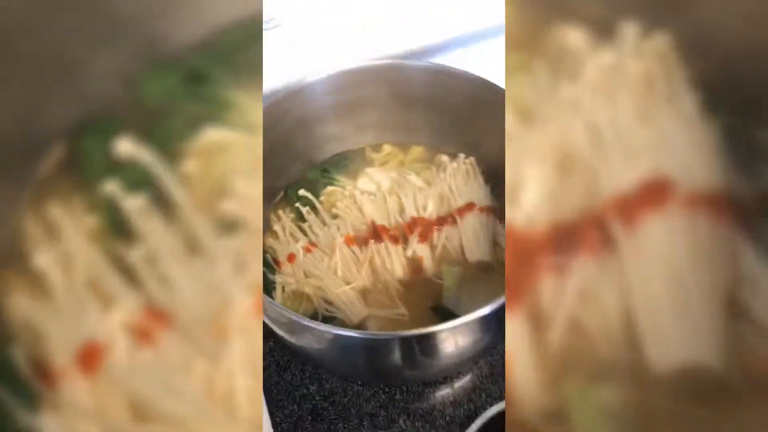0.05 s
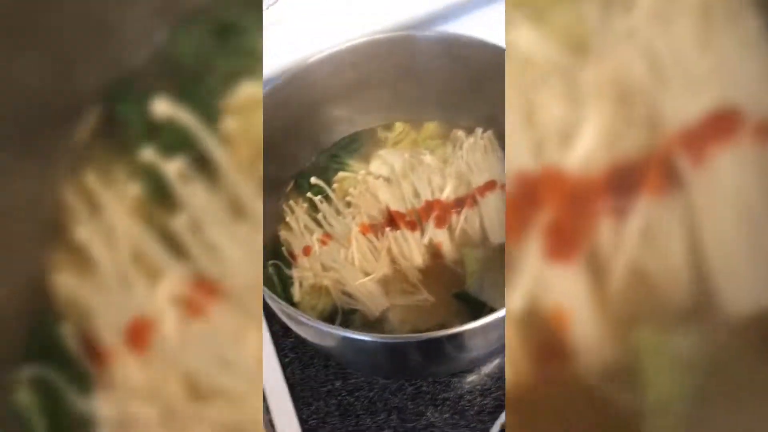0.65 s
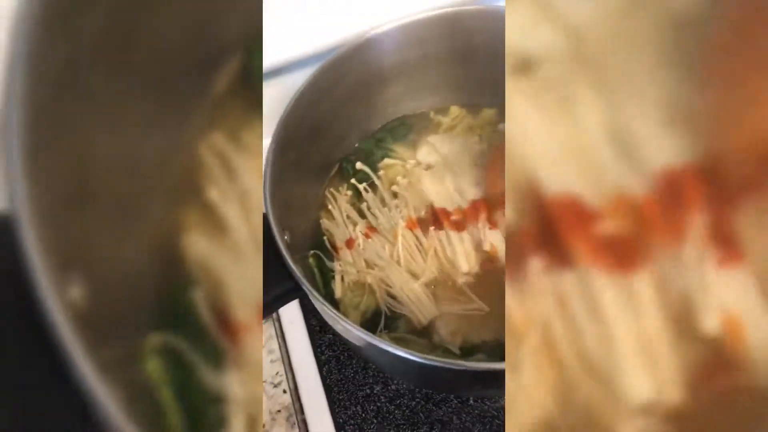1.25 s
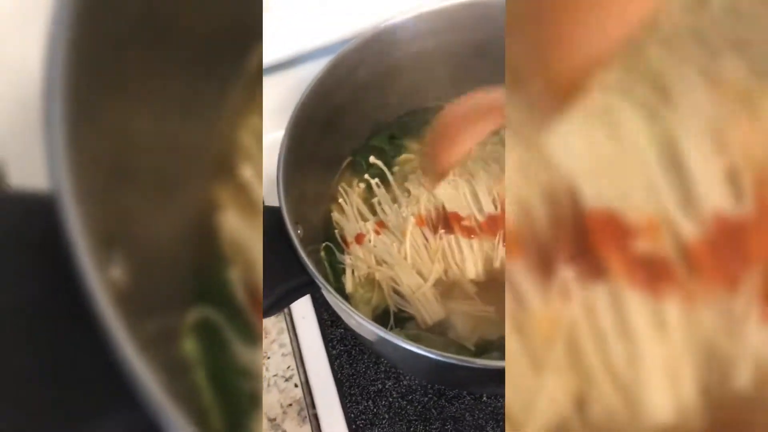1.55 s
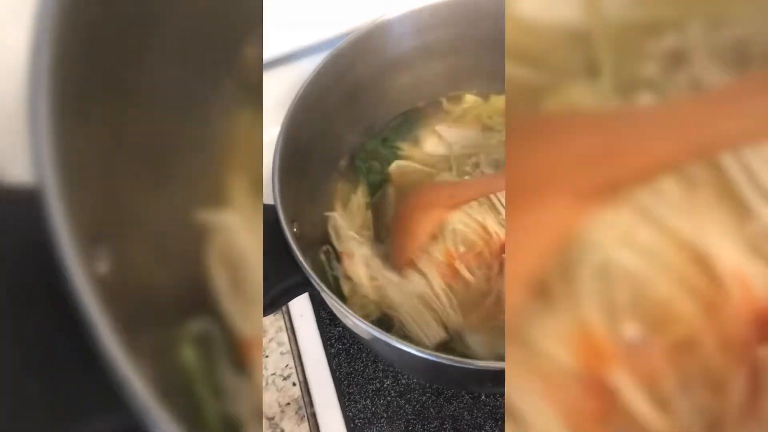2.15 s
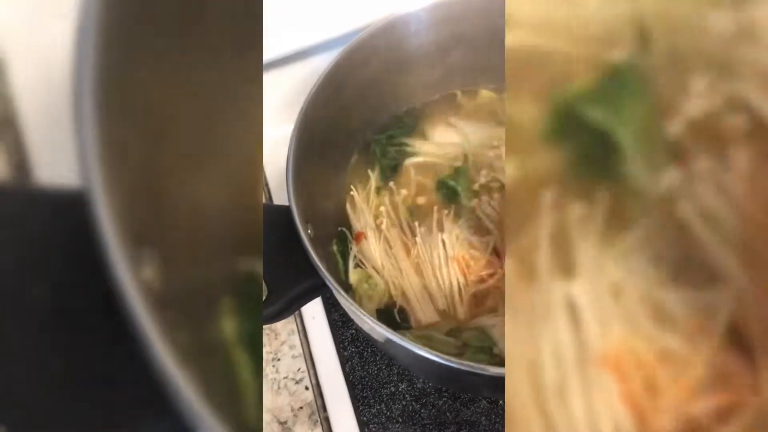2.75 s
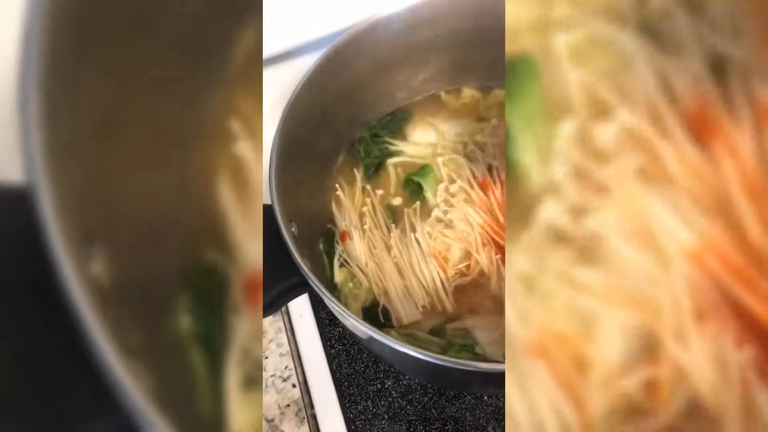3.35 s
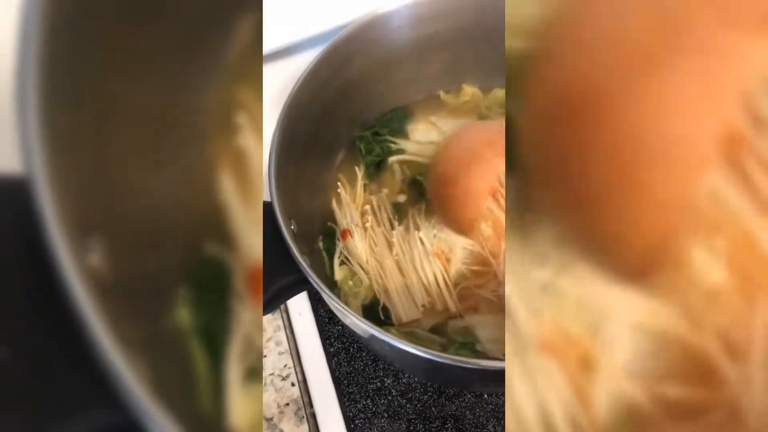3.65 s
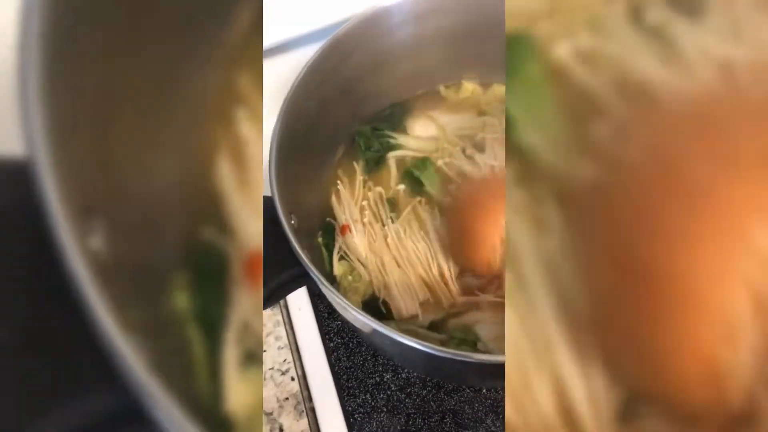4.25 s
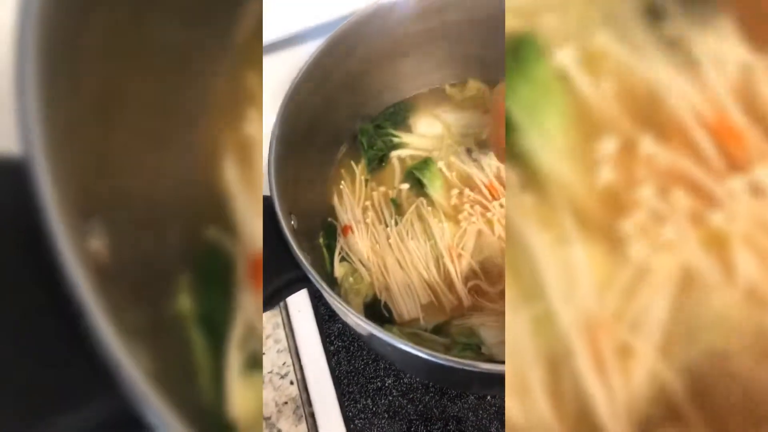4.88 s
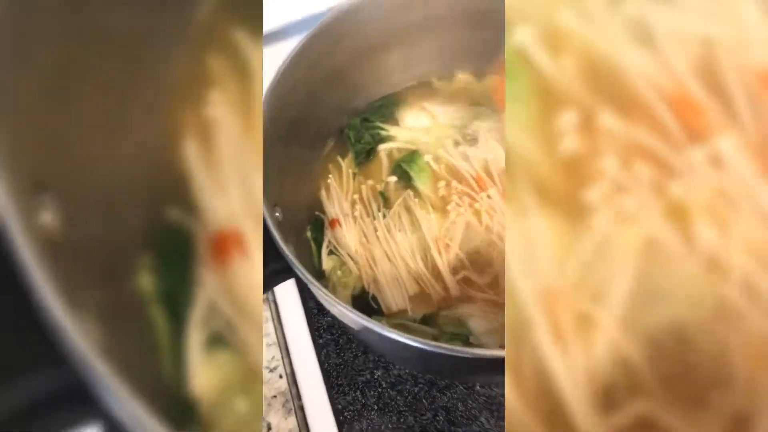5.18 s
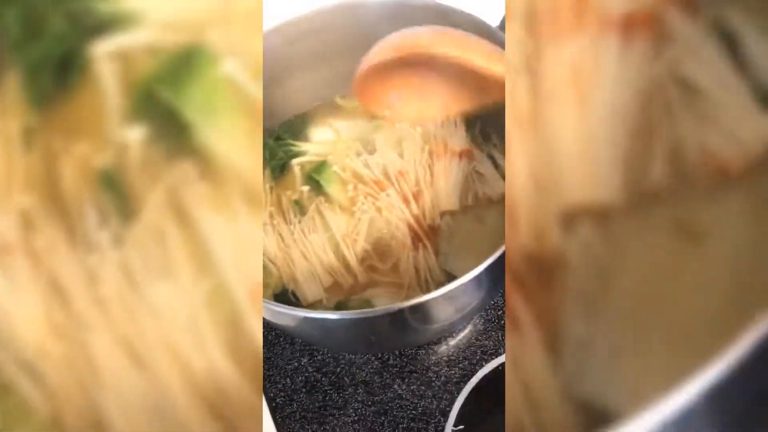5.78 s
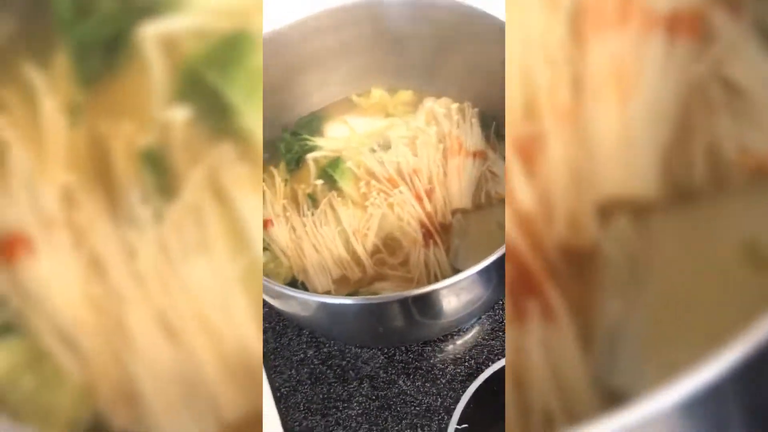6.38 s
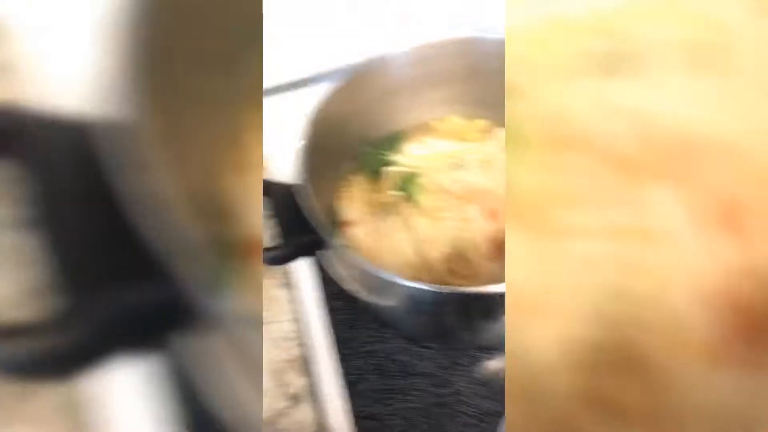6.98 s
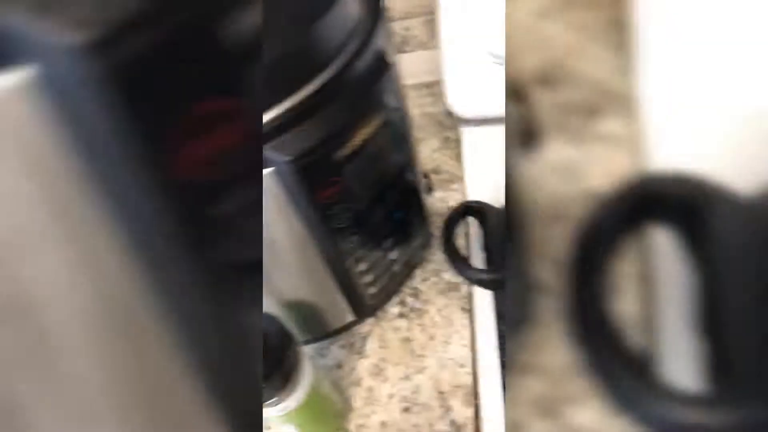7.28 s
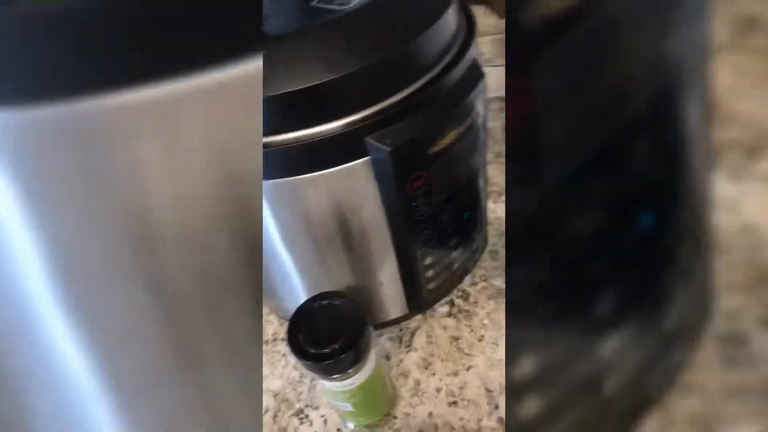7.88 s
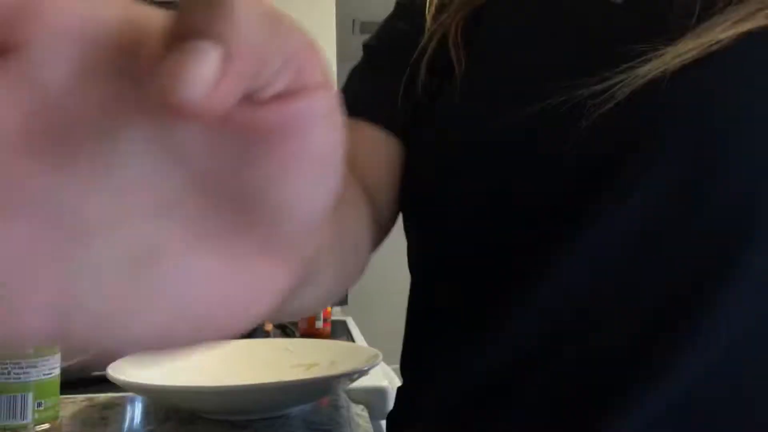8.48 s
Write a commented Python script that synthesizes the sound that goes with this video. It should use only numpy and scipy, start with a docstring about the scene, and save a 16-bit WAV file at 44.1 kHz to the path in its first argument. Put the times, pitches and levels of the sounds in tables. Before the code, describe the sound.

A pot of soup simmers with wet pops in a kitchen; a wooden spoon stirs, raps the metal rim five times and is set down.

```python
"""In a kitchen, noodle soup simmers in a steel pot on the stove while a wooden spoon stirs it.
Bubbles churn, pop and fizz, coloured by the air in the pot; each heave of the broth starts with a glug.
The spoon knocks five times on the rim, shaking the stove top, then is set down with a short clatter.
Low room noise and the stove's hum lie underneath. Near the end the listener turns away,
so the simmer and the background get a little softer."""
import sys
import numpy as np
from scipy import signal
from scipy.fft import rfft, irfft
from scipy.io import wavfile
from scipy.ndimage import uniform_filter1d

SR = 44100
rng = np.random.default_rng(int(sys.argv[2]) if len(sys.argv) > 2 else 0)


def master(y):
    """Save y as 16-bit WAV."""
    cut = np.clip(np.atleast_2d(y).T, -1, 1)
    pcm = np.round(cut * 32767)  # scale
    wavfile.write(sys.argv[1], SR, pcm.astype(np.int16))


N = 384993
TIME = np.arange(N) / SR

# the simmer, calmer once stirred, duller as the listener turns (time [s], churn [dB], fizz [dB])
SIMMER_LEVELS = [(0, -49.5, -55), (1.3, -48.5, -55), (1.9, -50.5, -57), (3.4, -51, -56.5),
                 (3.65, -53.5, -59.5), (5.0, -51, -57.5), (6.8, -54, -58), (7.7, -56, -62),
                 (8.3, -54.5, -60), (8.7, -55.5, -64.5)]
# the broth heaves, by itself or pushed by the spoon (time [s], length [s], level [dB], glug pitch [Hz])
HEAVES = [(.385, 0.15, -47.5, 181), (0.847, 0.24, -51, 297), (1.23, 0.34, -46, 265),
          (1.631, 0.12, -45.5, 268), (2.088, 0.18, -44.5, 250), (2.766, 0.06, -49, 284),
          (3.021, 0.205, -46, 290), (3.259, 0.18, -45, 250), (5.002, 0.2, -57.5, 264)]
# the largest bubbles (time [s], level [dB], pitch [Hz], spray compared with the bubble [dB])
BIG_POPS = [(0.255, -35.5, 2010, -6), (0.687, -33, 1980, -20), (1.271, -32.5, 1990, -9),
            (1.512, -28.5, 920, -12.5), (1.595, -26.5, 1550, -17), (1.741, -34.5, 990, -28),
            (2.059, -32, 1020, -13), (2.465, -29, 1020, -17), (2.602, -40, 1020, -5.5),
            (2.879, -31.5, 1025, -4.5), (3.028, -30, 1890, -14), (3.258, -25, 3350, -9.5),
            (3.29, -34.5, 1010, -25), (3.368, -23, 1490, -38), (3.397, -30, 990, -21),
            (3.744, -33, 3600, -27), (3.778, -36, 915, -7), (3.854, -33, 1750, -22),
            (3.966, -33.5, 980, -34), (4.493, -35, 1130, -29), (4.506, -29.5, 1070, -17),
            (4.681, -26.5, 1040, -18), (4.697, -26, 820, -35), (4.822, -34, 1310, -17),
            (4.996, -33, 1060, -11), (6.726, -26.5, 1520, -22), (7.006, -34.5, 1040, -14),
            (7.21, -34.5, 1920, -29), (7.278, -30, 1510, -30), (7.363, -33, 3370, -13),
            (7.531, -29, 3250, -16), (8.122, -35.5, 1050, -22), (8.256, -30, 1590, -18),
            (8.403, -30.5, 1050, -32)]
# small pops carry best near the pot's own notes (pitch [Hz])
SMALL_POP_PITCHES = [1050, 1500, 1850, 2050, 3160]
# notes that the air in the pot boosts (pitch [Hz], width [Hz], boost [dB])
POT_AIR_NOTES = [(251, 44, 4.5), (361.3, 37, 11.5), (518.5, 38, 9), (638, 56, 10), (1025, 143, 7),
                 (1520, 31, 7), (1910, 71, 8.5), (2600, 35, 6.5), (3260, 640, 5)]
# wet noodles slide over the spoon (time [s], length [s], level [dB])
SQUELCHES = [(1.269, .012, -42), (1.334, 0.031, -43.5), (2.394, 0.03, -48.5), (2.479, 0.012, -39),
             (3.169, 0.02, -44), (3.536, 0.036, -43.5), (4.118, 0.0095, -41.5), (4.678, 0.014, -39)]
# the spoon hits the rim (time [s], crack [dB], steel ring [dB], stove thump [dB])
RIM_KNOCKS = [(5.191, -6, 0, -5), (5.3828, -6, -1.5, -4), (5.5647, -4.5, -5, -0.5), (5.7475, -4, -2, 0),
              (5.9219, 0.5, -1, 1)]
# the spoon hits the counter (time [s], level [dB])
SPOON_BOUNCES = [(6.4929, -1.5), (6.6029, -12.5), (6.651, -21.5)]

# the notes each object rings with when hit (pitch [Hz], level [dB], time to fade by 60 dB [s])
POT_NOTES = [(530, -31, .15), (670, -35, .25), (840, -31, .15), (920, -30, .15), (1037, -33, .2),
             (1200, -35, .18), (1239, -34, .18), (1327, -34, .2), (1497, -23.5, .15), (1564, -25.5, .26),
             (1682, -26, .06), (3020, -26, .03), (6250, -24, .04), (6730, -6, .012), (6530, -27, .14),
             (6790, -26, .15), (7020, -26, .12), (7230, -30, .11)]
STOVE_NOTES = [(51, -35, .5), (70, -36, .4), (85, -33, .4), (122, -38, 1.1), (150, -12, .06),
               (199, -20, .24), (235, -11, .03), (259, -13, .16), (312, -22, .08), (377, -19, .13)]
SPOON_NOTES = [(233, -30, .18), (263, -16.5, 0.11), (620, -27, 0.16), (780, -23, .07), (826, -13, 0.064),
               (893, -20, 0.13), (1310, -36, 0.052), (1770, -17, 0.066), (2000, -32, 0.043),
               (2820, -25, 0.074), (3160, -26, 0.075), (3760, -18.5, 0.046)]

# the tone of each noisy sound, from bass to treble (frequency [Hz], relative level [dB])
CHURN_TONE = [(60, -19.5), (140, -1.5), (220, 8.5), (320, -3.5), (450, -5.5), (700, -4.5), (1100, -9),
              (2500, -67)]
FIZZ_TONE = [(500, -10.5), (1500, -7.5), (2600, -6), (3800, 4), (5000, 0.5), (6500, 5), (7500, 1),
             (10000, -0.5), (11500, -6)]
SPRAY_TONE = [(400, -6), (1200, 3), (2500, 0), (4200, 5.5), (6500, -1.5), (11000, -8)]
RIM_CRACK_TONE = [(50, -28), (250, 9), (500, 0), (1000, 0.5), (1300, 6.5), (1550, 6), (2100, -1),
                  (3100, -7), (3800, -9.5), (5500, -7.5), (6400, -3.5), (7000, -5.5), (7800, -18.5),
                  (11000, -25.5)]
COUNTER_CRACK_TONE = [(50, -29), (130, 2), (260, 6.5), (380, -1), (580, -3.5), (850, 4), (1500, -1),
                      (2100, -3.5), (3100, -1.5), (4300, -9.5), (5200, -13.5), (6000, -9), (7300, -16.5),
                      (11000, -23.5)]
WALL_TICK_TONE = [(1000, -14), (3000, -3), (4800, 3), (6300, -3), (8000, -19), (11000, -16)]
ROOM_TONE = [(20, -10), (35, -24), (55, 3.5), (90, -1), (150, -11), (400, -2), (800, -13.5), (2000, -20),
             (10000, -62)]
# how long the kitchen echoes (frequency [Hz], time to fade by 60 dB [s])
ECHO_TIMES = [(100, 0.5), (400, 0.24), (1500, 0.48), (4000, 0.3), (7000, 0.13), (11000, 0.085)]


def simmer():
    """Big slow bubbles churn the broth, small ones burst on top, the finest fizz on the hot steel."""
    times, churn_db, fizz_db = np.transpose(SIMMER_LEVELS)
    heave = heaving()
    churn_gain = np.hypot(gain(np.interp(TIME, times, churn_db)), heave)
    fizz_gain = np.hypot(gain(np.interp(TIME, times, fizz_db)), gain(-12.5) * heave)
    burst_gain = np.sqrt(churn_gain * fizz_gain)   # bursting grows with both stirring and heat
    surge = flutter(40)   # the trembling surface drives churn, bursts and fizz together
    churn = steady(shape_tone(crackle(700 / SR * gain(4 * surge), 3.6, size=N), CHURN_TONE))
    blubs = steady(swarm(base_per_s=120, low_hz=199, high_hz=735, cycles=12.2, spread_db=6, clump_db=3))
    bursts = swarm(base_per_s=400, low_hz=795, high_hz=2370, cycles=15, spread_db=4, clump_db=5)
    bursts = steady(bursts * gain(1.8 * surge))
    plips = steady(swarm(base_per_s=80, low_hz=1300, high_hz=5200, cycles=11, spread_db=4.5, clump_db=7))
    fizz = steady(shape_tone(crackle(5000 / SR * gain(3.8 * surge), 4.3, size=N), FIZZ_TONE))
    broth = churn_gain * (gain(-5.5) * churn + gain(-10) * blubs)
    surface = burst_gain * (gain(-6) * bursts + gain(-8) * plips)
    return broth + surface + gain(-1.35) * fizz_gain * fizz


def heaving(ramp_s=0.053, slosh_s=0.18, slosh_db=-52):
    """A loudness curve: the broth swells with each heave and sloshes with each knock on the rim."""
    out = np.zeros(N)
    swells = [row[:3] for row in HEAVES] + [(row[0], slosh_s, slosh_db) for row in RIM_KNOCKS]
    for start, length, db in swells:
        inside_s = np.minimum(TIME - start, start + length - TIME)
        out += gain(db) * np.clip(inside_s / ramp_s + .5, 0, 1)
    return out


def glugs():
    """As a heave begins, broth closes over a pocket of air and steam."""
    out = np.zeros(N)
    for start, _, db, hz in HEAVES:
        add(out, start, gain(db + 10.5) * bubble(hz, cycles=19, rise=0.046))
    return out


def swarm(base_per_s, low_hz, high_hz, cycles, spread_db, clump_db):
    """Bubbles of random size come in clumps; the smaller the bubble, the higher its note."""
    births = crackle(base_per_s / SR * gain(clump_db * flutter(25)), spread_db, size=N)
    pitch = low_hz * (high_hz / low_hz) ** rng.random(N)
    out = np.zeros(N)
    for i in np.flatnonzero(births):
        add(out, i / SR, births[i] * bubble(pitch[i], cycles))
    return unit_level(out)


def bubble(hz, cycles, rise=0.44):
    """A bubble rings for a few cycles and rises in pitch as it opens."""
    fade_s = cycles / hz
    t = TIME[:int(fade_s * SR) + 2]
    return np.sin(2 * np.pi * hz * t * (1 + rise * t / fade_s)) * fade(t, fade_s)


def pops(small_per_s=4, small_spray_db=-12.5):
    """Single bubbles burst: a short note, a spray of droplets, and a gulp as the broth closes."""
    out, spray, t = np.zeros(N), np.zeros(N), TIME[:SR // 20]
    small_pops = []
    for slot in range(int(small_per_s * N / SR)):
        start = (slot + rng.random()) / small_per_s
        db = rng.normal(-40, 2)
        small_pops.append((start, db, rng.choice(SMALL_POP_PITCHES), small_spray_db))
    for start, db, hz, spray_db in list(BIG_POPS) + small_pops:
        add(out, start, gain(db - 1.5) * pop_note(hz))
        droplets = crackle(chance=0.2, spread_db=1.6, size=len(t)) * fade(t, 0.05)
        add(spray, start, gain(db + spray_db - 1) * droplets)
        gulp_hz = 375 * np.exp(0.27 * rng.standard_normal())
        add(out, start, gain(db - 8.5) * bubble(gulp_hz, cycles=4.8))
    return out + shape_tone(spray, SPRAY_TONE)


def pop_note(hz, splash_width=1.34, opening_s=0.0017):
    """A bubble swings hard, then rings faintly, wrapped in the splash of its tearing skin."""
    t = TIME[:SR // 10]
    ring_s = 10.5 / hz + 0.017   # the pot keeps even the smallest ringing briefly
    note = np.sin(2 * np.pi * hz * t) * (fade(t, 7 / hz) + gain(-18.5) * fade(t, 2 * ring_s))
    tearing = rng.standard_normal(len(t)) * fade(t, 1.06 * ring_s)
    splash = keep_band(tearing, hz / splash_width, hz * splash_width)
    return (note + gain(-6) * splash / np.abs(splash).max()) * (1 - fade(t, opening_s))


def pot_air(sound):
    """The air above the soup boosts its own notes, like the air in a bottle."""
    for hz, width_hz, boost_db in POT_AIR_NOTES:
        note = signal.lfilter(*signal.iirpeak(hz, hz / width_hz, fs=SR), sound)
        sound = sound + (gain(boost_db) - 1) * note
    return sound


def noodle_squelches():
    """Noodles slide over the spoon, and wet films tear in a short swell of tiny clicks."""
    out = np.zeros(N)
    for start, length, db in SQUELCHES:
        swell = np.sqrt(np.hanning(int(length * SR)))
        clicks = crackle(chance=0.053, spread_db=1.6, size=SR // 4)[:len(swell)]
        add(out, start, gain(db) * swell * clicks)
    return shape_tone(out, SPRAY_TONE)


def spoon_bump(thud_at_s=4.341, thud_hz=125, tick_at_s=4.354):
    """Under the broth the spoon thuds on the pot's floor, then ticks against its wall."""
    out, t = np.zeros(N), TIME[:SR // 4]
    add(out, thud_at_s, gain(-35) * np.sin(2 * np.pi * thud_hz * t) * fade(t, 0.068))
    tick = crack(WALL_TICK_TONE, click_db=8, snap_db=-12, snap_s=0.036, tail_db=-29, tail_s=0.06)
    add(out, tick_at_s, gain(-21) * tick)
    return out


def rim_knocks(thump_delay_s=0.00229):
    """Wood hits the steel rim; a moment later the pot shoves the stove top, whose panels rumble."""
    out, t = np.zeros(N), TIME[:SR]
    for start, crack_db, ring_db, thump_db in RIM_KNOCKS:
        pot, stove = ring(POT_NOTES, vary_db=1.5), ring(STOVE_NOTES, vary_db=1)
        rumble = unit_level(keep_band(rng.standard_normal(SR), 95, 350)) * fade(t, 0.15)
        hit = crack(RIM_CRACK_TONE, click_db=3.5, snap_db=-11, snap_s=0.051, tail_db=-24.5, tail_s=0.13)
        add(out, start, gain(crack_db) * hit + gain(ring_db - 2.5) * pot)
        add(out, start + thump_delay_s, gain(thump_db) * (stove + gain(-11.5) * rumble))
    # the knocks carry no deep bass below about 46 Hz
    return signal.sosfilt(signal.butter(6, 46, "high", fs=SR, output="sos"), out)


def spoon_set_down():
    """The wooden spoon lands on the counter and bounces twice."""
    out = np.zeros(N)
    for start, db in SPOON_BOUNCES:
        wood = gain(-4.5) * ring(SPOON_NOTES, vary_db=3.5)
        hit = crack(COUNTER_CRACK_TONE, click_db=1, snap_db=-7, snap_s=0.027, tail_db=-23.5, tail_s=0.13)
        add(out, start, gain(db) * (wood + hit))
    return out


def ring(notes, vary_db):
    """A struck object rings with all its notes, in a slightly different mix each time."""
    t = TIME[:SR]
    return sum(gain(rng.normal(db, vary_db)) * np.sin(2 * np.pi * hz * t) * fade(t, fade_s)
               for hz, db, fade_s in notes)


def crack(tone, click_db, snap_db, snap_s, tail_db, tail_s):
    """A hard click of contact, then fading noise for the many tiny vibrations it leaves."""
    t = TIME[:SR]
    force = rng.standard_normal(SR) * (gain(snap_db) * fade(t, snap_s) + gain(tail_db) * fade(t, tail_s))
    force[0] += gain(click_db)
    return shape_tone(force, tone)


def kitchen_echo(sound, echo_db):
    """The walls add a wash of echoes that fades at its own pace in each octave."""
    t, tail = TIME[:SR // 2], 0
    edges_hz = np.geomspace(90, 12000, 8)
    for low, high in zip(edges_hz, edges_hz[1:]):
        band = keep_band(rng.standard_normal(len(t)), low, high)
        tail = tail + band * fade(t, look_up(ECHO_TIMES, np.sqrt(low * high)))
    tail = tail * (1 - fade(t, 0.0033))   # echoes build up after the direct sound
    return sound + gain(echo_db) * pass_through(sound, tail)


def background(hum_hz=120, turn_s=(7.2, 7.5)):
    """Dull room noise and the stove's electric hum, both softer once the listener turns away."""
    room = gain(-54) * shape_tone(rng.standard_normal(N), ROOM_TONE)
    hum = gain(-59.5) * np.sin(2 * np.pi * hum_hz * TIME)
    return gain(np.interp(TIME, turn_s, [0, -2])) * (room + hum)


def gain(db):
    """Turn decibels into a number to multiply by."""
    return 10 ** (np.asarray(db) / 20)


def unit_level(sound):
    """Scale a sound so its average power is 1."""
    return sound / np.sqrt(np.mean(sound ** 2) + 1e-20)


def steady(sound):
    """Steady heat: keep the power near 1 over each third of a second."""
    power = np.abs(uniform_filter1d(sound ** 2, size=SR // 3))
    return sound / np.sqrt(power + 1e-9)


def fade(t, fade_s):
    """A curve that falls by 60 dB in fade_s seconds."""
    return np.exp(-np.log(1000) * t / fade_s)


def flutter(per_s):
    """Quick random ups and downs with no lasting trend."""
    points = rng.standard_normal(4096)
    points = points - uniform_filter1d(points, size=7)
    return unit_level(np.interp(TIME * per_s, np.arange(len(points)), points))


def crackle(chance, spread_db, size):
    """Random clicks of uneven strength; chance is how likely each sample is to click."""
    strength = gain(spread_db * np.minimum(rng.exponential(1, size), 4))
    return unit_level((rng.random(size) < chance) * strength * rng.choice([-1, 1], size))


def add(out, start_s, sound):
    """Mix a sound in at the given time."""
    i = max(0, int(start_s * SR))
    out[i:i + len(sound)] += sound[:max(0, N - i)]


def look_up(table, hz):
    """Read between a table's rows, giving every octave equal room."""
    row_hz, values = np.transpose(table)
    return np.interp(np.log(np.maximum(hz, 1)), np.log(row_hz), values)


def keep_band(sound, low_hz, high_hz):
    """Turn down everything outside two frequencies."""
    return signal.sosfilt(signal.butter(2, [low_hz, high_hz], "band", fs=SR, output="sos"), sound)


def pass_through(sound, response):
    """Let every sample set off a copy of the response, which is scaled to an energy of 1."""
    return signal.oaconvolve(sound, response / np.linalg.norm(response))[:len(sound)]


def shape_tone(sound, tone, size=8192):
    """Give a sound the balance of bass and treble in a tone table."""
    levels_db = look_up(tone, np.fft.rfftfreq(size, 1 / SR))
    log_response = irfft(np.log(gain(levels_db)))
    # fold onto the first half, so the filter rings only after a click, never before it
    log_response[1:size // 2] *= 2
    log_response[size // 2 + 1:] = 0
    return pass_through(sound, irfft(np.exp(rfft(log_response))))


def scene():
    """Mix spoon, soup and background into one channel."""
    spoon = kitchen_echo(rim_knocks(), echo_db=-16.5) + kitchen_echo(spoon_set_down(), echo_db=-12)
    bubbling = pot_air(simmer() + noodle_squelches() + pops())
    soup = kitchen_echo(bubbling + glugs() + spoon_bump(), echo_db=-16)
    return (soup + spoon + background())[None]


def record(dry, ceiling=0.9, cutoff_hz=10700):
    """Round off the loudest peaks and cut the highest treble."""
    rounded = ceiling * np.tanh(dry / ceiling)
    return signal.sosfilt(signal.butter(24, cutoff_hz, fs=SR, output="sos"), rounded)


dry = scene()
out = record(dry)
master(out)
```